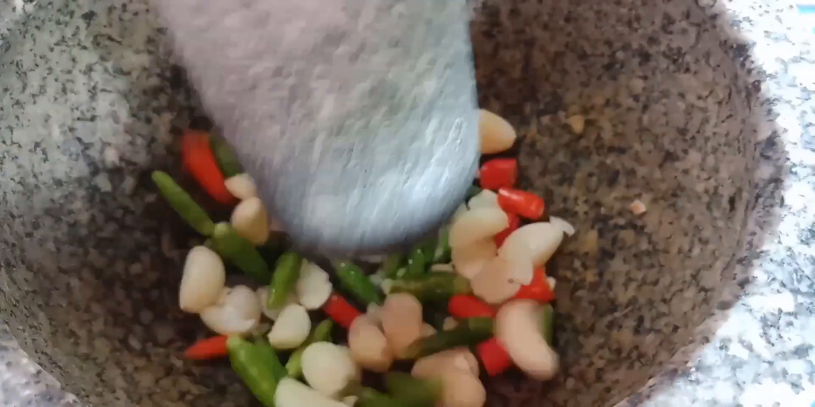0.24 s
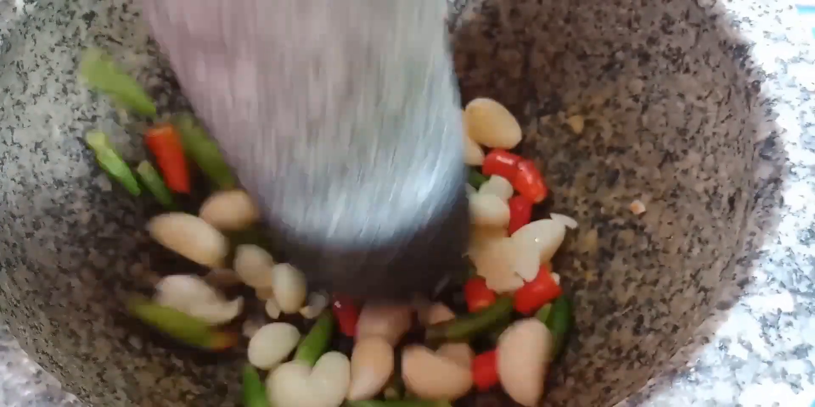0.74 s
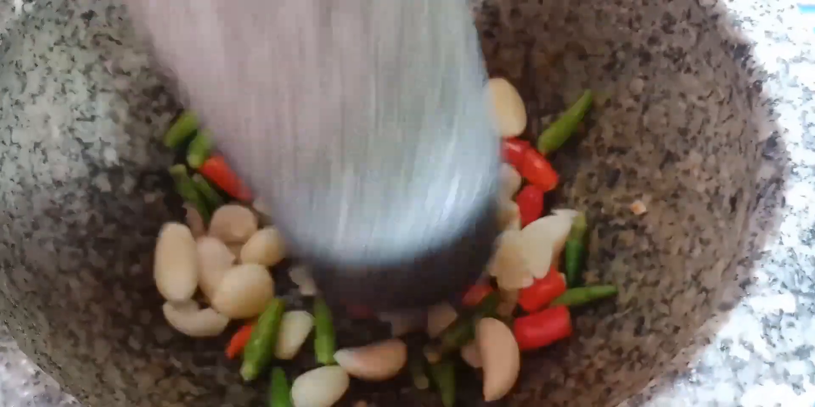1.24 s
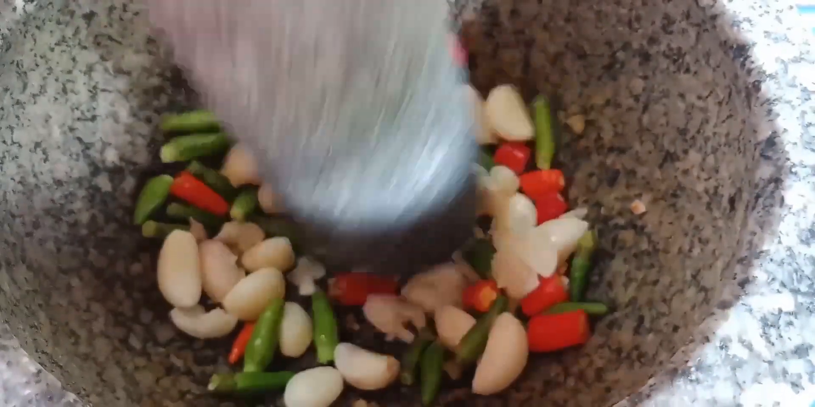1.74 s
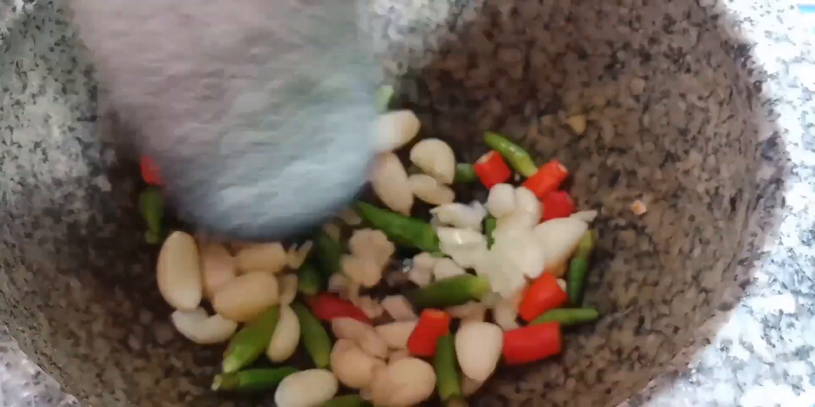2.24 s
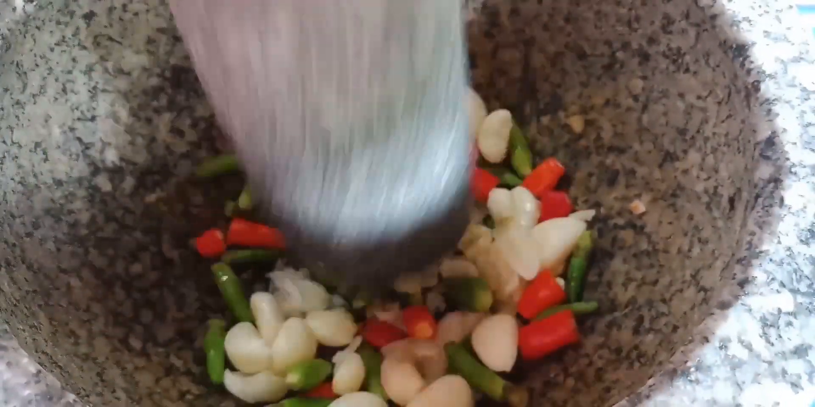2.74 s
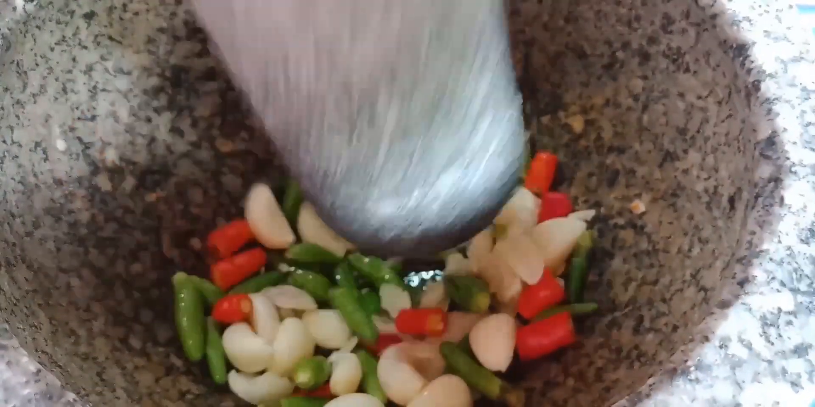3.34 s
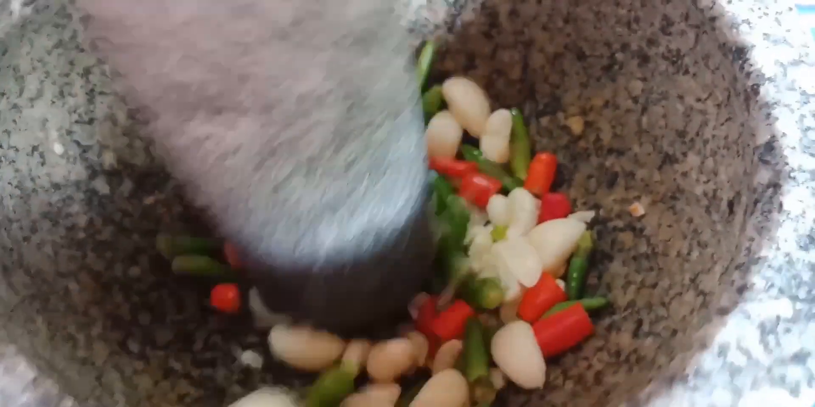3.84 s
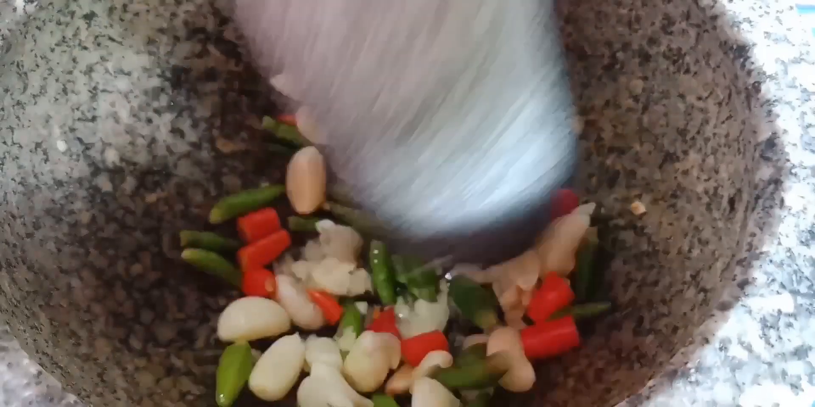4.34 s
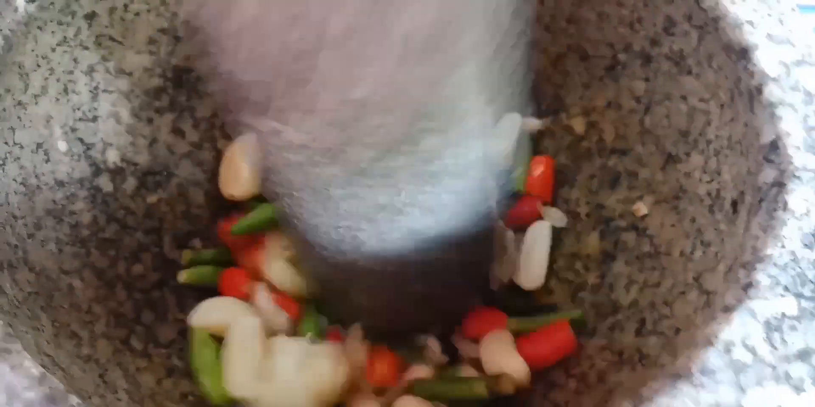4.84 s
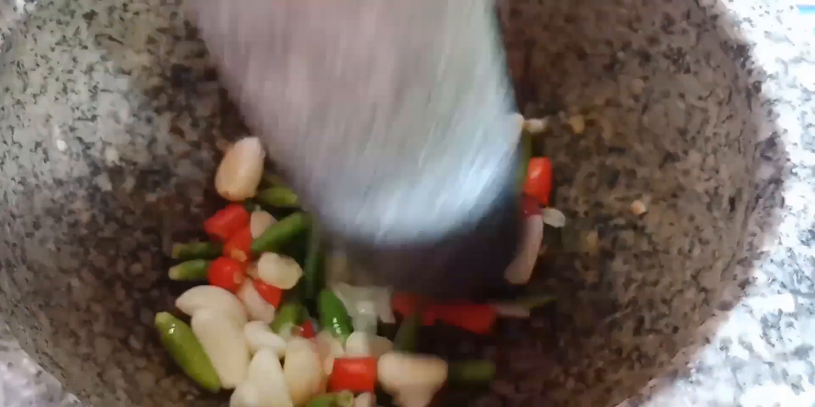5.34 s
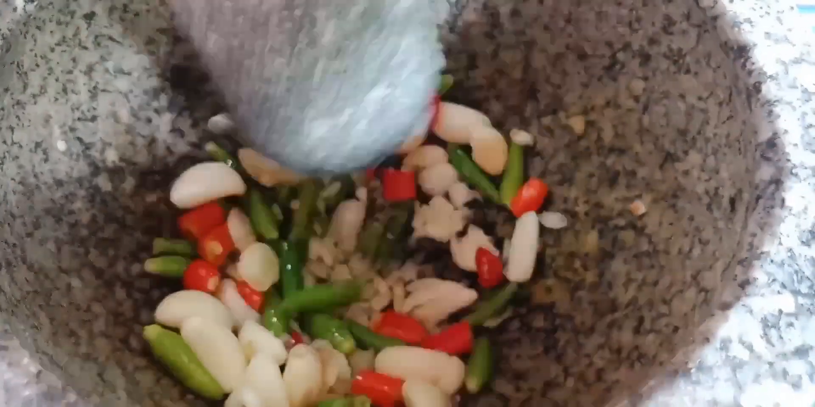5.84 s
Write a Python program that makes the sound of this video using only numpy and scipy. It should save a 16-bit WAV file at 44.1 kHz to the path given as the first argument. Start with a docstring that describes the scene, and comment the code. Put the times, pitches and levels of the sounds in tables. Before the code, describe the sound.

Close, quick stone-on-stone knocks as a pestle crushes garlic and chillies in a mortar, scraping faintly between blows.

```python
"""A small kitchen, a phone held close above a stone mortar, in stereo over a low house hum.
From the start a stone pestle pounds garlic and chillies, five blows a second: the pieces crackle, the air
in the bowl rings, the counter thumps, stone cracks on stone and the room answers. Just after the first
blow something hollow is jolted, once. From about a second in, the pestle drags on the wall between blows."""
import sys
import numpy as np
from scipy import signal
from scipy.fft import rfft, irfft
from scipy.io import wavfile
from scipy.ndimage import uniform_filter1d

SR = 44100
rng = np.random.default_rng(int(sys.argv[2]) if len(sys.argv) > 2 else 0)


def bounce(signal):
    """Save signal as a 16-bit WAV file at the path given by the first command-line argument."""
    frames = np.transpose(np.atleast_2d(signal))
    limited = np.clip(frames, -1, 1)
    pcm = np.round(limited * 32767).astype(np.int16)
    wavfile.write(sys.argv[1], SR, pcm)


N = 268112

# The pestle lands: (time [s], crack peak [dB], crack's favoured frequency [Hz], thump peak [dB],
# lower bowl-air mode [dB], upper bowl-air mode [dB])
PESTLE_BLOWS = [(0.0087, -12, 4700, -21, -35.5, -36), (0.214, -7, 4250, -14.5, -29, -35),
                (0.416, -22, 5140, -47.5, -33, -40), (0.424, -16, 5200, -35, -57, -49),
                (0.619, -27, 4120, -34, -53, -35), (0.7971, -12, 5500, -39.5, -41.5, -61),
                (1.0257, -9, 4200, -23, -37, -37), (1.2141, -5.5, 4900, -19.5, -27, -35),
                (1.3985, -11.5, 4100, -15, -25, -29), (1.6071, -8, 5800, -21, -37, -40),
                (1.7825, -15, 4350, -14.5, -26.5, -64), (1.9709, -24, 3880, -21, -40.5, -40),
                (2.1654, -0.5, 5360, -35, -24, -25), (2.3743, -23.5, 4950, -32, -41, -38.5),
                (2.5799, -11.5, 3700, -20.5, -38.5, -23.5), (2.768, -9, 4700, -25.5, -37.5, -38),
                (2.9632, -7.5, 4420, -29.5, -38, -29.5), (3.1644, -19, 3030, -41, -32, -25),
                (3.1844, -11, 4550, -19.5, -43, -40), (3.369, -60, 4400, -42, -42, -46),
                (3.3956, -13.5, 4230, -41, -44.5, -39), (3.576, -27.5, 4000, -44, -41, -31.5),
                (3.5918, -8.5, 4530, -24, -40, -44), (3.7915, -51, 4330, -25.5, -43, -46),
                (3.9996, -28, 4570, -23.5, -40, -35), (4.2188, -16, 5040, -29, -45, -47),
                (4.4154, -20.5, 5430, -49, -49.5, -54), (4.625, -14.5, 4050, -37.5, -57, -66),
                (4.8366, -6.5, 5100, -24, -38.5, -46), (5.021, -8.5, 4260, -25, -34, -31.5),
                (5.2685, -26, 3520, -37, -53.5, -44), (5.4824, -8.5, 3930, -38, -32.5, -26),
                (5.4899, -22.5, 3500, -25, -56, -47.5), (5.6896, -6.5, 5420, -16, -21, -31),
                (5.8966, -12.5, 4300, -17, -30.5, -38.5)]
# Pieces give way under the pestle: (start [s], hold [ms], level [dB])
CRUSHES = [(0.0012, 12.3, -24.5), (0.2082, 3, -22.5), (0.4141, 9.5, -23.5), (0.6003, 31, -32),
           (0.79, 4.2, -30), (0.804, 39, -45.5), (1.021, 8.5, -24.5), (1.2097, 8.9, -29.5),
           (1.395, 7.6, -24), (1.5981, 13, -25.5), (1.7787, 21.2, -37.5), (1.967, 5.3, -28.5),
           (2.1593, 12.4, -27.5), (2.3664, 21.4, -36), (2.5758, 4.8, -23.5), (2.762, 8.7, -28.5),
           (2.9593, 12, -25), (3.1611, 6.5, -29.5), (3.177, 6.8, -26.5), (3.358, 12.8, -44.5),
           (3.3758, 18.6, -29), (3.574, 13, -37), (3.588, 8, -30), (3.784, 15.7, -35), (3.9967, 12.5, -29),
           (4.202, 28.4, -32.5), (4.4099, 61, -42), (4.6194, 22, -33), (4.8304, 2.7, -20),
           (5.0127, 5.8, -19), (5.2637, 27, -52), (5.4792, 3.6, -19.5), (5.6856, 3.3, -23.5),
           (5.8912, 4.8, -25)]
# Modes of the air in the bowl: (frequency [Hz], level [dB], t60 [s])
AIR_MODES = [(750, 0, .024), (1540, 0, .022)]
# Modes of the mortar: (frequency [Hz], level [dB])
STONE_MODES = [(2550, 11.5), (3050, 11), (3600, 13), (4080, 7), (4480, 9), (4900, 4), (5350, 5), (6300, 2),
               (7450, 7.5), (8300, 2.5), (9360, -45), (10800, -45.5), (12600, -11), (14500, -5)]

LEFT_DB, RIGHT_LAG = 5.0, 8  # the left microphone is nearer: louder [dB] and earlier [samples]


def undb(db):
    """Decibels to amplitude."""
    return 10 ** (np.asarray(db) / 20)


def unit(x):
    """Scale to an RMS of 1."""
    return x / np.sqrt(np.mean(x ** 2))


def colour(x, points):
    """Shape a spectrum by (frequency [Hz], gain [dB]) points."""
    hz, db = np.transpose(points)
    n = x.shape[-1]
    bin_hz = np.maximum(np.arange(n // 2 + 1) * SR / n, 1)
    return irfft(rfft(x) * undb(np.interp(np.log(bin_hz), np.log(hz), db)), n)


def waver(rate_hz):
    """Random steps smoothed twice into a slow drift with an RMS of 1."""
    hold = int(SR / rate_hz)
    steps = np.repeat(rng.standard_normal(N // hold + 1), hold)
    return unit(uniform_filter1d(uniform_filter1d(steps, hold), hold)[:N])


def ring(modes, extra_db=0., phase=0.):
    """Damped modes (frequency [Hz], level [dB], t60 [s]) answering one tap."""
    hz, db, t60 = np.transpose(modes)
    t = np.arange(int(SR * t60.max()))[:, None] / SR
    decay = undb(db + extra_db) * np.exp(-np.log(1000) * t / t60)
    return (decay * np.sin(2 * np.pi * hz * t + phase)).sum(axis=1)


def place(out, time, x, pan_db):
    """Mix a sound into both microphones, the left earlier and louder by pan_db."""
    i = max(int(time * SR), 0)
    out[0, i:i + len(x)] += x * undb(pan_db / 2)
    out[1, i + RIGHT_LAG:i + RIGHT_LAG + len(x)] += x * undb(-pan_db / 2)


def house_hum():
    """Room tone: wavering rumble and hiss, with the bass common to both microphones."""
    # Spectrum of the room tone: (frequency [Hz], relative density [dB])
    spectrum = [(18, -61), (30, 4), (93, 4.5), (170, -6), (328, -6.5), (569, -14), (801, -16.5),
                (1130, -19.5), (2120, -22.5), (4530, -27.5), (8980, -41.5), (14400, -38.5), (16000, -43.5)]
    mid, side = colour(rng.standard_normal((2, N)), spectrum)
    side = colour(side, [(60, -17.0), (300, -9.0), (1200, 0.5)])
    level = undb(-54 + 1.7 * waver(rate_hz=6))
    return level * np.array([mid + side, mid - side]) / np.std(mid)


def crackle(per_second, spread_db, size):
    """Tiny breaks at random moments and of uneven force, each leaning left or right by chance."""
    breaks = rng.random(size) < per_second / SR
    force = breaks * undb(spread_db * rng.exponential(size=size)) * np.sign(rng.standard_normal(size))
    lean = undb(3 * rng.standard_normal(size))
    left = force * lean * undb(LEFT_DB / 2)
    right = np.roll(force / lean, RIGHT_LAG) * undb(-LEFT_DB / 2)
    return unit(np.array([left, right]))


def mortar_ring(extra_db, phase, detune, t60):
    """The stone rings, shorter in the top modes and off pitch under load; contact rounds the onset."""
    modes = [(hz * (1 + .025 * off), db, t60 * min(5000 / hz, 1))
             for (hz, db), off in zip(STONE_MODES, detune)]
    x = ring(modes, extra_db, phase)
    return x * np.minimum(np.arange(len(x)) / SR / 0.0002, 1)


def crushing(out):
    """Crackle swells as the pestle bites, holds while pieces give way, and rings stone and bowl air."""
    bite_s, rise_s, fade_s = 0.0033, 0.0025, 0.0038  # end of the swell; time constants up and down
    lead = SR // 50
    air = np.convolve(ring(AIR_MODES), np.hanning(SR // 2000))
    air = undb(-15.5) * air / np.linalg.norm(air)
    t = (np.arange(SR // 5) - lead) / SR
    flicker = undb(3 * waver(rate_hz=200))
    swell = np.exp(np.minimum(t - bite_s, 0) / rise_s)
    for start, hold_ms, db in CRUSHES:
        fade = np.exp(-np.maximum(t - hold_ms / 1000, 0) / fade_s)
        i = int(start * SR) - lead
        for _ in range(2):  # two spots in the bowl ring differently, both damped by wet pieces
            *mic_gains, phase, detune = rng.standard_normal((4, len(STONE_MODES)))
            stone = np.array([mortar_ring(3 * gain, phase, detune, t60=.006) for gain in mic_gains])
            stone /= np.linalg.norm(stone, axis=1)[:, None]
            bowl = np.pad(stone, [(0, 0), (0, len(air) - stone.shape[1])]) + air
            grains = crackle(per_second=1800, spread_db=3, size=len(t)) * undb(db - 3) * swell * fade
            crunch = signal.fftconvolve(grains, bowl, axes=1)[:, max(-i, 0):len(t)]
            out[:, max(i, 0):i + len(t)] += crunch * np.roll(flicker, -i)[:crunch.shape[1]]


def bowl_air(out):
    """Each blow rings the air in the bowl, a little off pitch as the pestle changes the air space."""
    lead_s = 0.001597  # ahead of the crack
    detunes = rng.standard_normal((len(PESTLE_BLOWS), len(AIR_MODES)))
    for (time, _, _, _, *mode_dbs), detune in zip(PESTLE_BLOWS, detunes):
        for (hz, db, t60), blow_db, off in zip(AIR_MODES, mode_dbs, detune):
            cycle = np.linspace(0, 2 * np.pi, int(SR / hz))
            tap = np.hanning(len(cycle)) * np.sin(cycle) * 8 / len(cycle)
            tone = ring([(hz * (1 + .04 * off), db, t60)], blow_db)
            place(out, time - lead_s, np.convolve(tone, tap), pan_db=6.5)


def counter_thumps(out):
    """A half-sine push into the counter, whose modes answer each blow a little differently."""
    # Modes of the counter: (frequency [Hz], level [dB], t60 [s])
    counter_modes = [(81.5, -15, 0.11), (102.8, -1, 0.065), (142, -5.5, 0.045), (200, -4.5, 0.022),
                     (280, -3, 0.011), (400, -21, 0.16)]
    lead_s = 0.00011  # ahead of the crack
    chance = rng.standard_normal((len(PESTLE_BLOWS), 2, len(counter_modes)))
    for (time, _, _, peak_db, _, _), (gain, detune) in zip(PESTLE_BLOWS, chance):
        contact_ms = max(2.78 + 0.31 * (-15 - peak_db), 1)  # weak blows land on pieces and push longer
        push = np.sin(np.linspace(0, np.pi, int(contact_ms * SR / 1000)))
        modes = [(hz * (1 + .03 * off), db, t60) for (hz, db, t60), off in zip(counter_modes, detune)]
        thump = np.diff(np.convolve(push, ring(modes, 1.5 * gain)))  # pressure follows acceleration
        place(out, time - lead_s, undb(peak_db) * thump / np.abs(thump).max(), pan_db=6)


def stone_cracks(out):
    """Stone meets stone at a new spot each blow, waking the mortar's modes unevenly."""
    mode_hz = np.transpose(STONE_MODES)[0]
    chance = rng.standard_normal((len(PESTLE_BLOWS), 5, len(mode_hz)))
    for (time, db, favoured_hz, *_), (left, other, phase, detune, spot) in zip(PESTLE_BLOWS, chance):
        emphasis_db = np.maximum(-14 * np.abs(np.log2(mode_hz / favoured_hz)), -9)
        pan_db = LEFT_DB + 4 * spot[0]
        right = .8 * left + .6 * other  # the microphones hear partly the same mode strengths
        for mic, gain, side in ((0, left, 1), (1, right, -1)):
            crack = mortar_ring(emphasis_db + 3 * gain, 1.5 * phase, detune, t60=.009)
            i = int(time * SR) + RIGHT_LAG * mic
            out[mic, i:i + len(crack)] += undb(db + side * pan_db / 2) * crack / np.abs(crack).max()


def kitchen_echo(x):
    """Diffuse echoes off the walls, longest in the mids; the bass reaches both microphones alike."""
    # Reverberation by band: (frequency [Hz], level [dB], t60 [s])
    echo_bands = [(102.3, -10.5, 0.1), (336, -7.5, 0.23), (990, -14.5, 0.42), (2256, -10.5, 0.14),
                  (4240, -22, 0.25), (7800, -12, 0.099)]
    t = np.arange(SR // 2) / SR
    tail = 0
    for hz, db, t60 in echo_bands:
        band = signal.butter(2, [hz / 1.72, hz * 1.53], "band", fs=SR, output="sos")
        mid, side = signal.sosfilt(band, rng.standard_normal((2, len(t))))
        side *= min(hz / 900, 1)
        decay = np.exp(-np.log(1000) * t / t60) * np.minimum(t / 0.0015, 1)
        tail = tail + undb(db) * np.array([mid + side, mid - side]) * decay / np.linalg.norm(decay)
    return signal.fftconvolve(x.mean(axis=0)[None], tail, axes=1)[:, :N]


def hollow_knock(out):
    """Something hollow is jolted: a short rough push swells in its modes."""
    # Modes of the hollow thing: (frequency [Hz], level [dB], t60 [s])
    hollow_modes = [(460, -3, .03), (684, 0, .02), (974, -6, .02), (1180, -3, .02)]
    # The one jolt: (time [s], length [s], peak [dB])
    time, length, db = (.033, .022, -21.5)
    n = int(length * SR)
    rough_push = np.hanning(n) * (rng.random(SR)[:n] < .03)
    soft_push = np.convolve(rough_push, np.hanning(30))
    knock = np.convolve(np.diff(soft_push), ring(hollow_modes))
    place(out, time, undb(db) * knock / np.abs(knock).max(), pan_db=0)


def dragging(out):
    """Dense grit slips on rough stone, swelling and easing with each stroke."""
    # Pestle and pieces on the mortar's wall: (middle [s], length [s], level [dB], brightness [Hz])
    strokes = [(1.266, 0.15, -53, 4460), (1.68, 0.16, -65.5, 4240), (1.828, 0.12, -54, 3860),
               (2.051, .2, -51.5, 3940), (2.232, 0.16, -56.5, 5000), (2.617, 0.44, -66.5, 3500),
               (2.852, 0.096, -64.5, 4000), (3.35, 0.067, -65.5, 3650), (3.497, 0.17, -73, 3500),
               (3.938, 0.16, -65.5, 3700), (4.199, .075, -58.5, 3100), (4.567, 0.15, -57.5, 4330),
               (4.946, 0.084, -60.5, 3700), (5.118, 0.24, -54, 3760), (5.454, 0.1, -58, 3860),
               (5.763, 0.095, -63, 4300), (6.003, 0.095, -58, 3120)]
    # Spectrum of the slip: (frequency / brightness [ratio], relative density [dB])
    slip_spectrum = [(.3, -26), (.6, -19), (.8, 12.5), (1.15, 9.5), (1.499, -13), (2.2, -22.5),
                     (3.5, -25.5)]
    flicker = undb(1.5 * waver(rate_hz=55))
    for middle, length, db, bright_hz in strokes:
        n = int(length * SR / 2) * 2
        i = int((middle - length / 2) * SR)
        grit = crackle(per_second=9000, spread_db=2, size=n) + .6 * rng.standard_normal((2, n))
        slip = unit(colour(grit, [(ratio * bright_hz, gain_db) for ratio, gain_db in slip_spectrum]))
        swell = np.sin(np.linspace(0, np.pi, n))
        out[:, i:i + n] += undb(db) * swell * slip * np.roll(flicker, -i)[:n]


def scene():
    """The mortar close up, with the kitchen's echo and hum behind it."""
    direct, air = np.zeros((2, 2, N + SR))
    counter_thumps(direct)
    bowl_air(air)
    stone_cracks(direct)
    hollow_knock(direct)
    crushing(direct)
    dragging(direct)
    to_walls = (direct + undb(-8) * air)[:, :N]  # the bowl aims its ring upward, away from the walls
    spots = 5  # places in the bowl, hit in turn, each with its own echo pattern
    spot_changes_s = np.transpose(CRUSHES)[0] - .02
    spot = np.searchsorted(spot_changes_s, np.arange(N) / SR) % spots
    echo = sum(kitchen_echo(to_walls * (spot == k)) for k in range(spots))
    return (direct + air)[:, :N] + echo + house_hum()


def record(dry):
    """The phone thins the deepest bass, rounds the sharpest peaks and cuts the top."""
    low_cut = signal.butter(2, 60., "high", fs=SR, output="sos")
    high_cut = signal.ellip(8, .2, 70, 15800, fs=SR, output="sos")
    rounded = np.tanh(signal.sosfilt(low_cut, dry))
    return signal.sosfilt(high_cut, rounded)


dry = scene()
out = record(dry)
bounce(out)
```